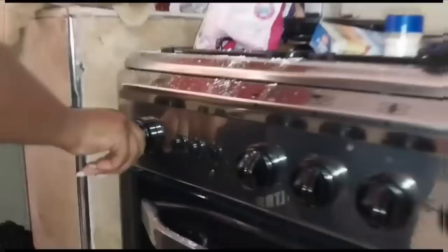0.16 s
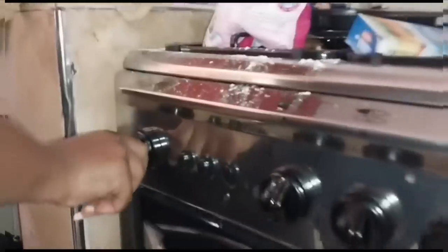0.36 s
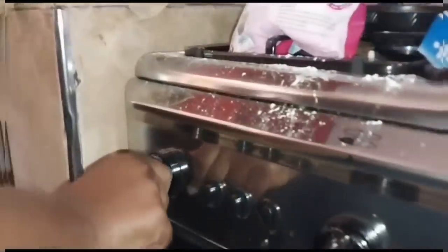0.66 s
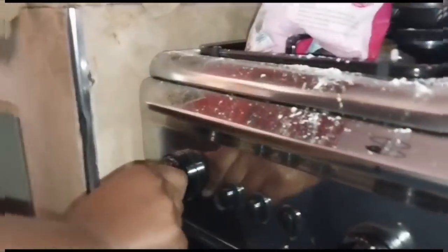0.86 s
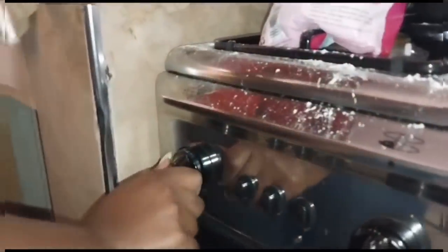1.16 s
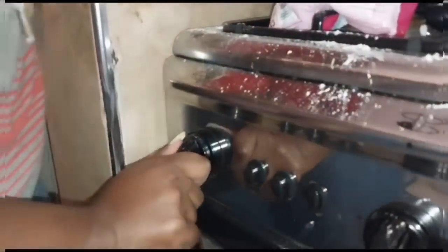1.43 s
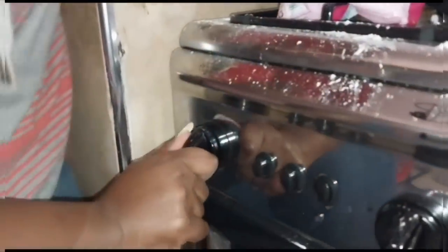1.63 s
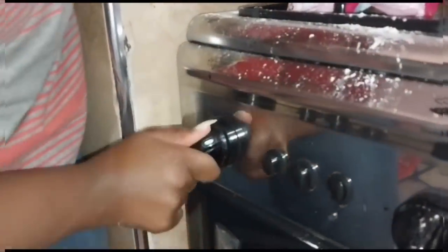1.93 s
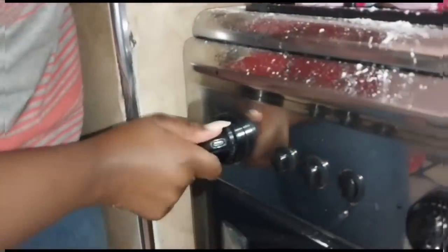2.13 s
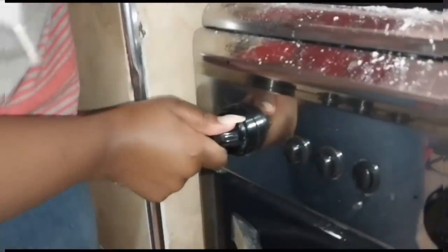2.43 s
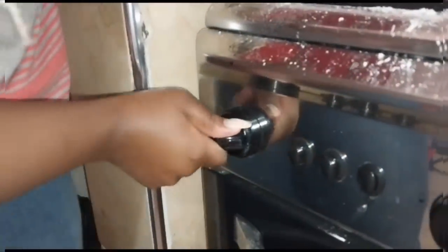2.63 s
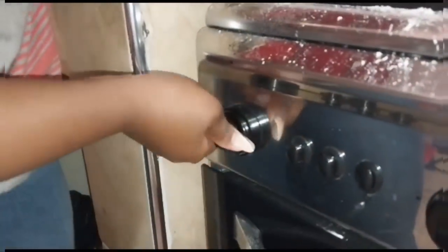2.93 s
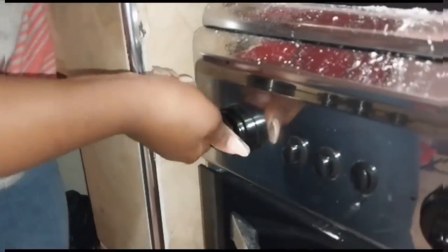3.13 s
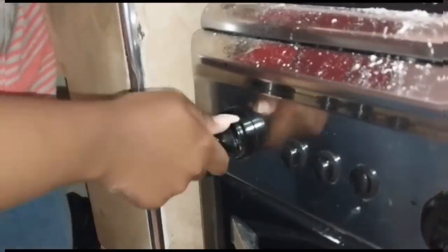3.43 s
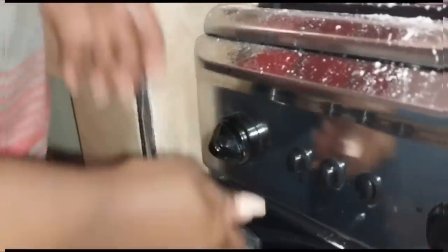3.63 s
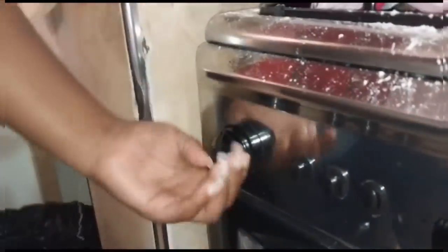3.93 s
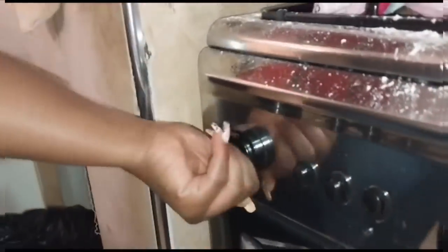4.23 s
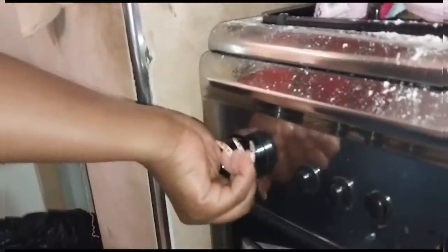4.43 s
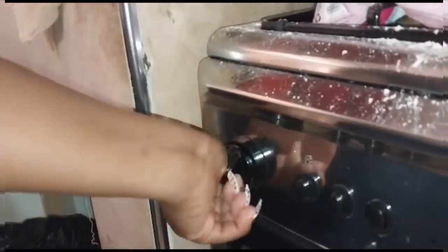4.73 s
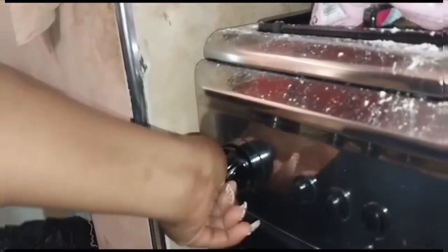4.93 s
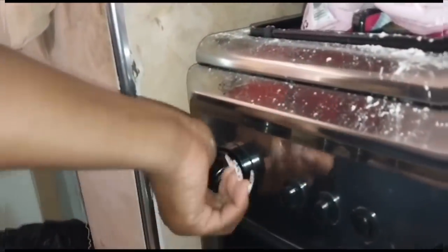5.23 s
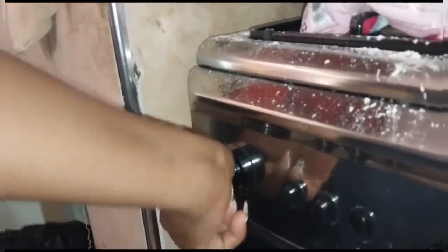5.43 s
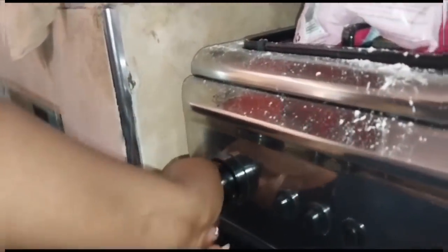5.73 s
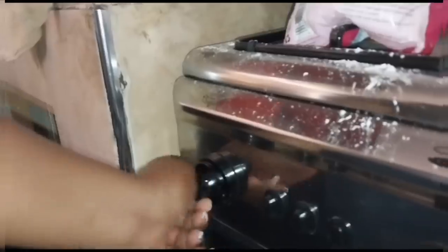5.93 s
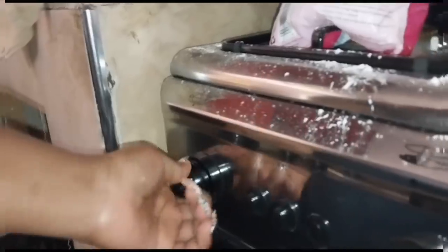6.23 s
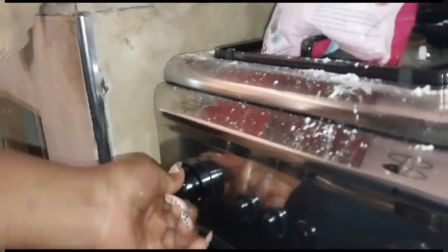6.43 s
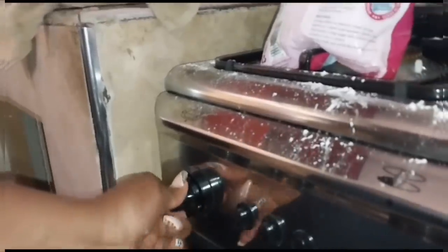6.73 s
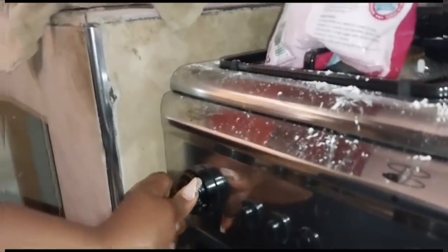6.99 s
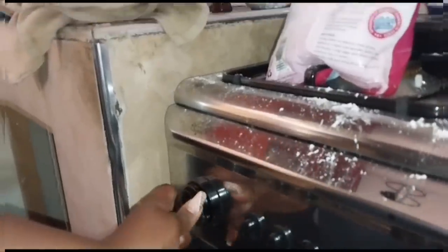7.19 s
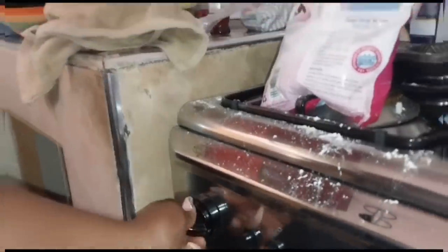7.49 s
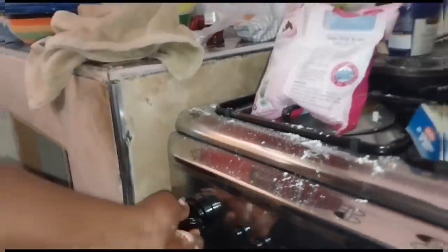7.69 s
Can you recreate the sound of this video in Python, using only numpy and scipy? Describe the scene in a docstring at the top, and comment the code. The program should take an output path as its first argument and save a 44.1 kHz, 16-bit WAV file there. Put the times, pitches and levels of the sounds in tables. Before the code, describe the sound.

A stiff plastic cooker timer knob clicks irregularly as it is turned, with one brief bell ding, low thuds and foot scuffs in a small kitchen.

```python
"""A stiff plastic timer knob of a cooker is turned by hand in a small hard-walled kitchen.
Clicks: noise rattles ring damped modes of shaft, knob shell and steel panel, plus dense room reflections.
Steps and pushes thud low through damped modes; the timer bell, which rings out at 1.78 s, sums decaying sines.
Slipper scuffs, a low rustle after the first thud and a drag are shaped noise over a faint room hiss;
two phone microphones hear it all."""
import sys
import numpy as np
from scipy import signal
from scipy.fft import rfft, irfft, next_fast_len
from scipy.io import wavfile
from scipy.ndimage import uniform_filter1d

SR = 44100
rng = np.random.default_rng(int(sys.argv[2]) if len(sys.argv) > 2 else 0)


def to_linear_factor(level_db):
    """Convert decibel levels (scalar or array-like) to linear amplitude factors."""
    exponent = np.asarray(level_db, float) / 20
    return 10 ** exponent


def persist_wave(psi):
    """Save psi, clipped to +-1, as 16-bit WAV."""
    counts = np.round(np.clip(psi, -1, 1) * 32767).astype(np.int16)
    wavfile.write(sys.argv[1], SR, np.atleast_2d(counts).T)


N = 346299

# Knob clicks: (time [s], shaft level [dB], then re shaft: top end [dB], knob shell [dB], steel panel [dB])
KNOB_CLICKS = [(0.1278, -14.0, -2.5, -5, -23), (0.3864, -37, -3, -19, -39), (0.4774, -29.5, -6.0, -6, -10),
               (0.7994, -45, -11.5, -15.5, -6), (0.844, -32.5, -2.0, -10, -25),
               (0.8928, -29.0, -2, -27.5, -17), (1.1404, -21, 1, -20.5, -40),
               (1.3641, -20.5, -27.0, -32.5, -37), (1.6151, -19.5, 1, -29, -28.5),
               (1.7714, -9.0, -18, -13.5, -25.5), (1.7822, -10.0, -5, -4.5, -19), (1.8009, -20, 3, -4, -13),
               (1.8613, -25.5, 5, -11, -10.5), (1.9066, -20, 0.5, -6.5, -25),
               (1.952, -20.5, -0.5, -32.5, -14), (2.0265, -28, 6.5, -19, -9),
               (2.0708, -22.5, 3.5, -24, -26), (2.139, -27.5, 3.5, 1.5, -13), (2.2268, -21.5, 0, -8.5, -16),
               (2.3125, -27, 9, -17.5, -16.5), (2.3477, -30, 11, -0.5, -17.5), (2.58, -24, 4.5, -28, -41),
               (2.7072, -30.5, 3.5, 4.5, -13), (2.7926, -21, -1.0, -8.5, -15.5), (2.815, -22, 3.5, -8, -39),
               (2.8529, -23, 2, -2.5, -15.5), (2.9023, -30.5, 0.0, 3.5, -10), (2.9475, -20, -3, -4, -17),
               (2.9604, -29.5, -6, -11, -26), (2.9929, -19.0, 0, -8.5, -26.5),
               (3.0836, -20.0, 0.5, -14, -33), (3.1294, -41, -21, -2.5, -14), (3.326, -43, -33, -29, -37.0),
               (3.3425, -23.5, -7, -40, -23.5), (3.3607, -26.5, -1, -19, -19),
               (3.4072, -30, -3, -2.5, -11.5), (3.4996, -44.5, 0.0, 7.5, -12), (3.5364, -52.5, 2, 12, -3),
               (3.5514, -43, -2, -13.5, -27), (3.5912, -30.0, 0.0, -22, -36),
               (3.8282, -53, 6, -20.5, -37.0), (3.8492, -29.0, -2.5, -32.5, -33), (3.983, -53, -4, 5, 7.5),
               (4.0294, -57.0, 5, 11.5, 1), (4.122, -28.5, -1.5, -32.5, -27), (4.1337, -46, 3, 10.5, -1),
               (4.1968, -29, -1.5, -3, -9.5), (4.2697, -46.5, -2, 5.5, -12.0), (4.3181, -31, -4, -5.5, -20),
               (4.4026, -19.5, -7.0, -17, -20.0), (4.571, -26.5, 1.5, -7.5, -12),
               (4.6357, -25.5, -11, -7, -11), (4.6602, -18.5, -2.5, -15.5, -16),
               (4.6771, -22.5, -5, -3.5, -20), (4.7311, -25.0, 2, -11, -14.0),
               (4.798, -17.5, 1.5, -5.5, -15), (4.817, -27, -22, 3.5, -21), (4.9082, -16, -3.5, -11, -20.0),
               (4.9719, -23.5, -3.0, -7.5, -14.5), (5.0245, -28, -3.0, -22.5, -20.0),
               (5.1911, -26.0, -5, -27, -19.5), (5.216, -32, 7, -5, -12.5), (5.4198, -50, -19, 3.5, -11),
               (5.454, -30.5, -4.0, -22.5, -17.0), (5.4628, -14, 1.5, -13.5, -24.5),
               (5.5661, -21, -13, -15, -18), (5.5958, -29.5, 7.5, 3, -19),
               (5.6456, -23.5, 2.0, -5.5, -13.5), (5.7118, -18.5, -0.5, -16, -19.5),
               (5.75, -36.5, -8.0, 1, -27), (5.9333, -42, -32, -30, -34.0), (5.9503, -33.5, 1, -37, -27),
               (5.9687, -32.5, 2.0, -6, -14), (6.1624, -45.5, -34, -37, -35.0),
               (6.2063, -33.0, 7, -35, -32.5), (6.4622, -15.5, 1.5, -13, -21.5),
               (6.7342, -23, -30.0, -27, -43), (6.762, -23, -1.5, -6.5, -21.5),
               (6.8277, -29, 7.5, 0.5, -25), (6.8421, -30.5, 9.5, 6, -11), (6.847, -27, -5, 1, -27),
               (6.8703, -35, 7.0, 3, -14), (6.9016, -22, -2.0, -6, -19.5), (6.9317, -29, 4, 4.5, -33),
               (6.9569, -21.5, -4, -4, -17), (6.976, -21.5, 1.5, -32.5, -27), (7.047, -31, 6, 0.5, -37.0),
               (7.0626, -20.5, -2, -9, -21), (7.076, -40, 4.0, 4.5, -11), (7.1038, -36.5, 9, 3, -26.0),
               (7.126, -48, 13, -10.5, -11.0), (7.1702, -22.5, -0.5, -3.5, -21),
               (7.2483, -27, 3, -30, -27.0), (7.3271, -25.5, -2.0, -30, -20),
               (7.3561, -26.5, 2, -7.5, -26.0), (7.4864, -43.0, -12.0, -30.5, -37.0),
               (7.5038, -26.5, -1.0, -34, -38.5), (7.577, -26.5, -2, -2, -19.5),
               (7.7166, -28.5, 0, -11, -29), (7.767, -23, 0.5, -37, -35.5)]
# Shaft modes: (factor on main ring [1], width [Hz], level [dB])
SHAFT_MODES = [(1.0085, 303, 0), (1.34, 1380, -2), (0.76, 460, -8), (1.17, 1100, -7)]
# Top-end modes of the click: (frequency [Hz], width [Hz], level [dB])
TOP_MODES = [(9200, 1030, 18), (11660, 2050, 18.5), (14600, 1500, -35)]
# Knob shell modes: (frequency [Hz], width [Hz], level [dB])
SHELL_MODES = [(3060, 320, 9.5), (2415, 410, 2), (4240, 313, -10.5), (1720, 900, -7.5)]
# Steel panel modes: (frequency [Hz], width [Hz], level [dB])
PANEL_MODES = [(994, 51, 8.5), (918, 31, -2), (1071, 57, -6.5), (1250, 130, -3), (608, 63, -16)]
# the shaft rings lower when the blow goes more into the panel
RING_HZ, RING_DROP_HZ_PER_DB, RING_SCATTER_HZ = 4860, 13.5, 257
CLICK_LEAD_S = 0.0008


def knob():
    """Each click is a short rattle that rings shaft, shell and panel; clicks take turns on five room tails."""
    t = np.arange(8192) / SR
    tap = np.exp(-t / 0.00003)  # one clean blow, for the even colour that reaches the walls
    groups, near = np.zeros((5, N)), np.zeros((2, N))
    for k, (time_s, db, top_db, shell_db, panel_db) in enumerate(KNOB_CLICKS):
        ring_hz = RING_HZ - RING_DROP_HZ_PER_DB * panel_db + RING_SCATTER_HZ * rng.standard_normal()
        shaft = [(ring_hz * factor, width, level) for factor, width, level in SHAFT_MODES]
        parts = [(0, shaft), (top_db, TOP_MODES), (shell_db, SHELL_MODES)]

        decay = np.exp(-t / 0.0018) + 0.21 * np.exp(-t / 0.0047)
        rattle = rng.standard_normal((2, len(t))) * (1 - np.exp(-t / 0.00098)) * decay
        lag_s, bounce = rng.uniform((0.002, 0.1), (0.012, 0.45))  # the loose knob rocks back once
        rattle = rattle + bounce * np.roll(rattle, round(lag_s * SR), axis=1)
        snap = np.array([sum(to_linear_factor(level) * ringing(push, modes) for level, modes in parts)
                         for push in rattle])

        # each click favours other panel modes
        luck_db = 1.5 * rng.standard_normal(len(PANEL_MODES))
        struck = [(f, width, level + luck) for (f, width, level), luck in zip(PANEL_MODES, luck_db)]
        # the sheet takes the blow up, then lets it die
        swell = (1 - np.exp(-t / 0.00088)) * np.exp(-t / 0.0081)
        shake = rng.standard_normal((2, len(t))) * swell
        pushes = [softened(shake[0] + 1.8 * push, hz=1430) for push in shake]
        panel = to_linear_factor(panel_db) * np.array([ringing(push, struck) for push in pushes])
        add(near, time_s - CLICK_LEAD_S, to_linear_factor(db) * (snap + panel))

        # summed over all directions the modes blur into broad humps
        around = sum(to_linear_factor(level) * ringing(tap, modes, spread=5.4) for level, modes in parts)
        to_walls = to_linear_factor(db + 6) * (around + to_linear_factor(-4.5) * panel[0])
        add(groups[k % len(groups)], time_s - CLICK_LEAD_S, to_walls)
    return near + to_linear_factor(-1.0) * sum(kitchen(group) for group in groups)


# Timer bell partials: (frequency [Hz])
BELL_PARTIAL_HZ = [1247, 1276, 2588, 2652, 3058, 4293, 6352, 7035, 8807, 11694, 12090, 14996]
# The same partials: (level [dB], T60 [s])
BELL_PARTIALS = [(-0.5, 0.17), (-7.5, 0.24), (4.5, 0.51), (-1, .4), (-15, 0.55), (-9, 0.92), (-18, .5),
                 (-12.5, 0.41), (-6.5, 0.27), (1, 0.31), (-7, .06), (-26, .22)]
BELL_S, BELL_DB = 1.782, -27.5


def bell():
    """The timer bell's partials swell in over milliseconds and decay exponentially; close pairs beat."""
    t, out = np.arange(SR) / SR, np.zeros((2, N))
    ear_phase_turns = np.array([[0], [0.15]])
    swell = 1 - np.exp(-(t / 0.0028) ** 2)
    for hz, (db, t60_s) in zip(BELL_PARTIAL_HZ, BELL_PARTIALS):
        partial = np.sin(2 * np.pi * (hz * t + ear_phase_turns))
        add(out, BELL_S, to_linear_factor(BELL_DB + db - 60 * t / t60_s) * partial * swell)
    return out


# Steps and pushes: (time [s], level [dB], boom [Hz], 350-700 Hz part re boom [dB], part under 125 Hz re boom [dB])
THUD_BLOWS = [(0.144, -26.5, 210, -7.5, -7), (0.32, -40.5, 213, -29.0, -4.5),
              (0.401, -47.5, 210.0, -28, -13), (0.48, -45, 200, -25, -12.5), (0.798, -51, 219, -16.0, -11),
              (1.647, -55, 195.0, -14, -9), (1.773, -32, 158, -4, -4.5), (1.906, -37, 193, -13, -24.0),
              (2.027, -39, 242.0, -18, -30.0), (2.139, -41, 236, -11, -18.0),
              (2.219, -42.5, 233, -9.5, -11), (2.352, -47, 186, -11.0, -13.5), (2.506, -51, 196.7, -35, -8),
              (2.72, -48.5, 174, -2.0, -13.0), (2.791, -43, 186, -3, -26.0), (2.9, -39.5, 198, -10, -14.5),
              (3.021, -44, 139, -22, -32), (3.402, -39.0, 212, -4.5, -30.0), (3.984, -42, 196, -13, 1),
              (4.013, -35, 201, -18, -14), (4.175, -34, 150, -30.0, -6), (4.199, -36.5, 179, 0.0, -24),
              (4.437, -41.5, 186, -10.5, -30), (4.571, -41.5, 203.2, -9, -16),
              (4.675, -35.5, 214, -3.5, -16), (4.818, -38, 267, -5.5, -15),
              (4.914, -37, 264.0, -9.5, -26.0), (4.974, -41, 235, -34, -25), (5.207, -45.0, 187, -9, -15.5),
              (5.478, -45.5, 213, -2.5, -11.5), (5.607, -42, 171.0, -10.5, -20),
              (5.725, -41.5, 264, -12, -23), (5.969, -50, 249, -6.5, -18), (6.4, -44.5, 195, -27.5, -30.0),
              (6.468, -47, 199, -0.5, -19), (6.739, -46, 171, -19, -32), (6.848, -46.5, 159.6, -16, -12.5),
              (6.96, -47.5, 204.0, -9, -24), (7.069, -44.5, 183, -20, -30.0),
              (7.171, -50.5, 217.0, -13, -27.0), (7.367, -54, 200.0, -2.5, -10),
              (7.582, -55, 277, 0.5, -19.0), (7.749, -55.5, 163, -10, -16)]
# Cooker body modes: (frequency [Hz], width [Hz], level [dB])
BODY_MODES = [(143, 28, -16), (199.9, 11, 0), (227, 76, 0), (276, 220, -5.5)]
# Cooker side sheet modes: (frequency [Hz], width [Hz], level [dB])
SIDE_MODES = [(415.3, 13, -2.5), (501, 60, 5), (597, 150, 3.5)]
# Floor modes: (frequency [Hz], width [Hz], level [dB])
FLOOR_MODES = [(93.8, 9.7, -2.5), (72, 54, -1)]
BOOM_T60_S, BOOM_SLOPE = 0.59, 0.95  # T60 of the blow at a 200 Hz boom; lower booms last longer


def thuds():
    """Steps and pushes: a soft rumbling blow that swells in the cooker body and floor."""
    t, out = np.arange(32768) / SR, np.zeros((2, N))
    for time_s, db, boom_hz, upper_db, deep_db in THUD_BLOWS:
        t60_s = BOOM_T60_S * (200 / boom_hz) ** BOOM_SLOPE
        envelope = (1 - np.exp(-t / 0.0088)) * to_linear_factor(-60 * t / t60_s)
        blow = rng.standard_normal((2, len(t))) * envelope
        blow[1] = 0.7 * blow[0] + 0.34 * blow[1]
        for ear, push in zip(out, blow):
            boom = ringing(softened(push, hz=330), BODY_MODES + [(boom_hz, 22, 4)])
            upper = to_linear_factor(upper_db) * ringing(softened(push, hz=705), SIDE_MODES)
            deep = to_linear_factor(deep_db) * ringing(softened(push, hz=123.6), FLOOR_MODES)
            add(ear, time_s - 0.01, to_linear_factor(db) * (boom + upper + deep))
    return out


# Scuffs, and the low rustle after the first thud:
# (time of full level [s], hold [s], level [dB], part above about 4 kHz [dB], part below 1.5 kHz [dB])
SCUFF_STROKES = [(0.024, .03, -58.5, -2, 2), (0.154, 0.066, -47, -5.5, 14.5),
                 (0.493, 0.075, -38.5, -2, 3.5), (0.789, 0.079, -45.5, -5.5, 2),
                 (1.02, 0.057, -33, -3, -10), (1.518, .12, -53.5, -3, -11), (2.543, 0.14, -53, -1.5, -6),
                 (3.628, .12, -49, -6, -18), (4.398, 0.084, -46, -1, -2)]
# Rasp spectrum: (frequency [Hz], relative density [dB per Hz])
GRIT_SPECTRUM = [(290, -26), (500, -11.5), (553, -17), (2070, -6.5), (2540, 1), (4660, -2), (8700, -4.5),
                 (12300, -5.5), (16000, -7)]
LIFT_DB_PER_S = 259


def scuffs():
    """Soles scuffing a gritty floor, and one low rustle: a fine, dense rasp swells and fades, with reflections."""
    rasp, out = patchy_noise(GRIT_SPECTRUM, patchy_db=1.5, size=256), np.zeros((2, N))
    rasp *= to_linear_factor(0.16 * unit_rms(uniform_filter1d(rng.standard_normal(N), size=120)))  # fine-grained flutter
    hz = np.fft.rfftfreq(N, 1 / SR)
    bright = irfft(rfft(rasp) / (1 + (4300 / (hz + 1)) ** 8), N)
    low = irfft(rfft(rasp) / (1 + (hz / 1500) ** 8), N)
    middle = rasp - bright - low
    for time_s, hold_s, db, bright_db, weight_db in SCUFF_STROKES:
        colour = middle + to_linear_factor(bright_db) * bright + to_linear_factor(weight_db) * low
        out += stroke(time_s, hold_s, db, LIFT_DB_PER_S) * colour / np.std(middle)
    return out + to_linear_factor(-9.5) * kitchen(out[0])


# Drag friction spectrum: (frequency [Hz], relative density [dB per Hz])
DRAG_SPECTRUM = [(240, -65), (400, -27), (598, -12), (697, -22.5), (1180, -15.5), (1580, -27),
                 (2150, -15.5), (3930, -14.5), (5110, -1.5), (5600, -14), (7630, -7.5), (8760, -13),
                 (16000, -23.5)]
DRAG_S, DRAG_HOLD_S, DRAG_DB, DRAG_LIFT_DB_PER_S = 1.13, 0.17, -41, 53


def drag():
    """A lighter drag trails the loudest scuff: coloured friction noise that dies away slowly."""
    gain = stroke(DRAG_S, DRAG_HOLD_S, DRAG_DB, DRAG_LIFT_DB_PER_S)
    return gain * patchy_noise(DRAG_SPECTRUM, patchy_db=1.3)


# Room hiss spectrum: (frequency [Hz], relative density [dB per Hz])
HISS_SPECTRUM = [(15, -45), (25, 4), (190, 6), (416, -11.5), (714, -16), (962, -16.5), (1190, -29),
                 (1740, -28), (2480, -19), (4030, -17), (5140, -13), (7110, -16.5), (8360, -14.5),
                 (12500, -13), (16000, -15)]
HISS_DB = -61


def room_hiss():
    """Faint, steady coloured noise whose spectrum drifts in patches."""
    return to_linear_factor(HISS_DB) * patchy_noise(HISS_SPECTRUM, patchy_db=3.0, size=1024)


# Kitchen decay: (frequency [Hz], T60 [s])
ROOM_T60 = [(100, 0.39), (300, 0.47), (1000, 0.27), (2000, 0.39), (5000, 0.18), (13000, 0.14)]
# Left-right likeness of diffuse sound, also used by patchy_noise(): (frequency [Hz], correlation [1])
EAR_LIKENESS = [(60, 0.63), (180, 0.67), (550, 0.038), (1650, 0.19), (4970, -0.23), (15000, 0.14)]


def kitchen(x):
    """Dense reflections, each band dying at its own speed, starting after the first wall."""
    taps = rng.standard_normal((2, SR // 2))
    hz, t, z = signal.stft(taps, SR, nperseg=256)
    same = np.clip(read(EAR_LIKENESS, hz), -1, 1)[:, None]
    z[1] = same * z[0] + np.sqrt(1 - same ** 2) * z[1]
    t60_s = read(ROOM_T60, hz)[:, None]
    # the next room feeds back a slower tail
    fading = to_linear_factor(-60 * t / t60_s) + to_linear_factor(-21.5 - 60 * t / (2.6 * t60_s))
    tail = signal.istft(z * fading / np.sqrt(t60_s), SR, nperseg=256)[1]
    tail *= np.clip(np.arange(tail.shape[1]) / SR / 0.0024 - 0.4, 0, 1)
    return signal.fftconvolve(x[None], tail / np.linalg.norm(tail[0]), axes=1)[:, :N]


def patchy_noise(spectrum, patchy_db, size=512):
    """Stereo noise of a given colour and unit rms, with drifting patches; the bass is most alike in both ears."""
    hz = np.fft.rfftfreq(size, 1 / SR)
    a, b, c, d, patches = rng.standard_normal((4 * N // size + 5, len(hz), 5)).T
    patches = uniform_filter1d(patches, size=40, axis=0)
    patches = unit_rms(uniform_filter1d(patches, size=12, axis=1))
    same = np.clip(read(EAR_LIKENESS, hz), -1, 1)[:, None]
    left = a + 1j * b
    right = same * left + np.sqrt(1 - same ** 2) * (c + 1j * d)
    z = np.array([left, right]) * to_linear_factor(read(spectrum, hz)[:, None] + patchy_db * patches)
    return unit_rms(signal.istft(z, nperseg=size, noverlap=3 * size // 4)[1][:, :N])


def ringing(push, modes, spread=1):
    """A push played through damped modes (Hz, width Hz, dB) that radiate little below their pitch; peak 1."""
    hz, response = np.fft.rfftfreq(len(push), 1 / SR), 0
    for f, width, db in modes:
        low_cut = (1j * hz / (f + 1j * hz)) ** 2
        resonance = abs(width) ** 0.5 / (spread * abs(width) / 2 + 1j * (hz - f))
        response = response + to_linear_factor(db) * low_cut * resonance
    sound = irfft(rfft(push) * response, len(push))
    return sound / abs(sound).max()


def softened(push, hz):
    """A soft blow carries little above hz."""
    return signal.sosfilt(signal.butter(2, hz, fs=SR, output="sos"), push)


PRESS_DB_PER_S, SAG_DB_PER_S = 500, 18.5


def stroke(time_s, hold_s, db, lift_db_per_s):
    """Gain of one rub: a quick rise, a sagging hold, a fade."""
    t = np.arange(N) / SR - time_s
    press_db = PRESS_DB_PER_S * np.minimum(t, 0)
    sag_db = SAG_DB_PER_S * np.clip(t, 0, hold_s)
    lift_db = lift_db_per_s * np.maximum(t - hold_s, 0)
    return to_linear_factor(db + press_db - sag_db - lift_db)


def unit_rms(x):
    """Scales to rms 1."""
    return x / np.sqrt(np.mean(x ** 2) + 1e-20)


def read(points, hz):
    """Interpolates a table over log frequency."""
    f, value = np.transpose(points)
    return np.interp(np.log(hz + 1), np.log(f + 1), value)


def add(mix, time_s, sound):
    """Adds a sound into the mix at time_s, in place."""
    part = mix[..., round(time_s * SR):][..., :sound.shape[-1]]
    part += sound[..., :part.shape[-1]]


def scene():
    """Knob, bell, thuds, scuffs, drag and room hiss."""
    return knob() + bell() + thuds() + scuffs() + drag() + room_hiss()


def roll_off(x):
    """The treble ends steeply here."""
    return signal.sosfilt(signal.butter(12, 16560, fs=SR, output="sos"), x)


# Microphone port resonances: (frequency [Hz], level [dB])
MIC_RESPONSE = [(1000, 2), (3500, 0), (4500, 3), (5200, 6), (6100, 1.5), (7000, 3.5), (8400, -4.5),
                (9500, -2.5), (12000, 1.5), (16000, -4)]
# Port balance: (frequency [Hz], left re right [dB])
PORT_BALANCE = [(60, -3.0), (120, -2.0), (240, -2.5), (480, -3.5), (950, -2.5), (1890, -6.5), (3770, -9.0),
                (7520, -9.5), (15000, -8.5)]
EDGE_HZ = 15640


def record(dry):
    """Two microphone ports, the right hearing far more treble; then the band edges and the ceiling."""
    size = next_fast_len(N)
    hz = np.fft.rfftfreq(size, 1 / SR)
    ratio = to_linear_factor(read(PORT_BALANCE, hz))
    colour = to_linear_factor(read(MIC_RESPONSE, hz)) / (1 + (hz / EDGE_HZ) ** 60) / (1 + (36 / (hz + 1)) ** 4)
    ports = 2 * colour * np.array([ratio, np.ones(len(hz))]) / np.sqrt(1 + ratio ** 2)
    heard = irfft(rfft(dry, size) * ports, size)[:, :N]
    return roll_off(np.clip(heard, -1, 1))


dry = scene()
out = record(dry)
persist_wave(out)
```